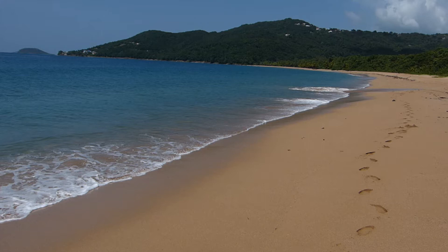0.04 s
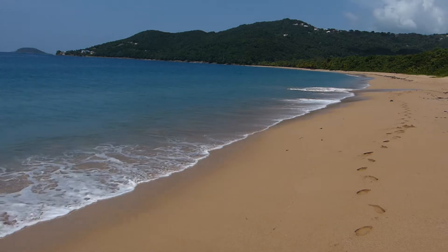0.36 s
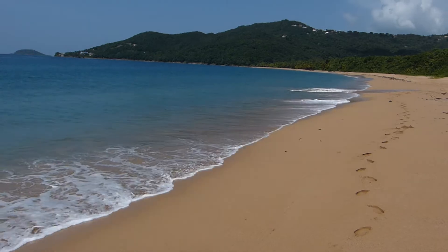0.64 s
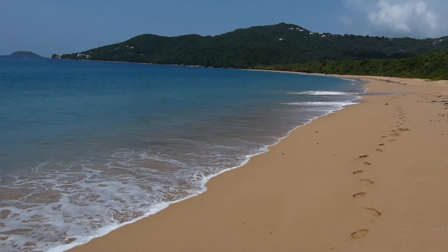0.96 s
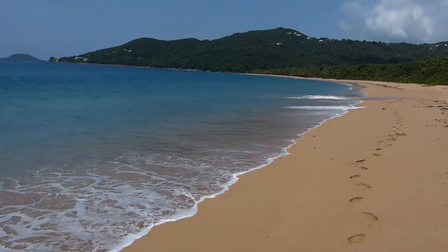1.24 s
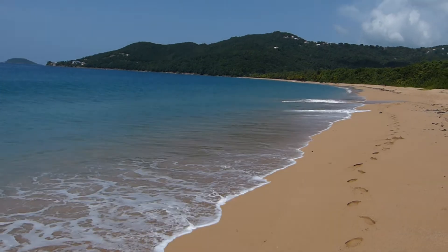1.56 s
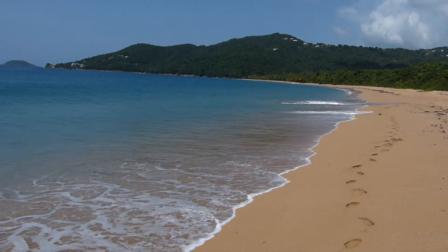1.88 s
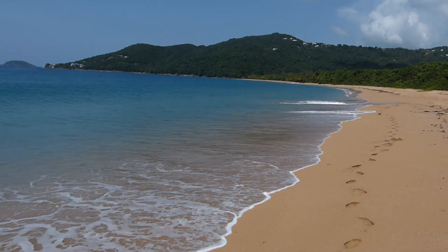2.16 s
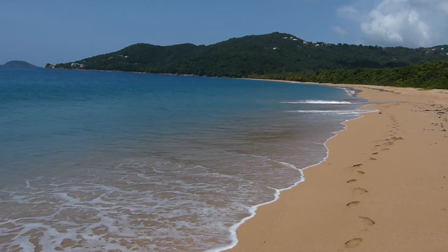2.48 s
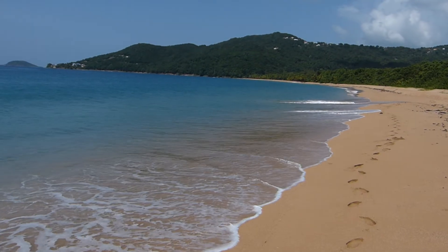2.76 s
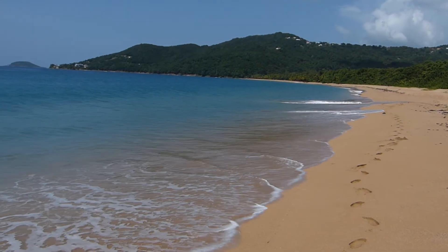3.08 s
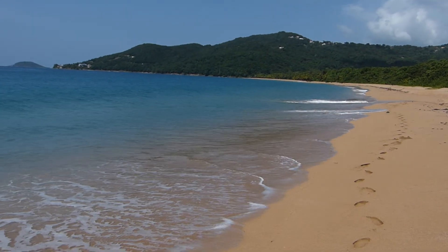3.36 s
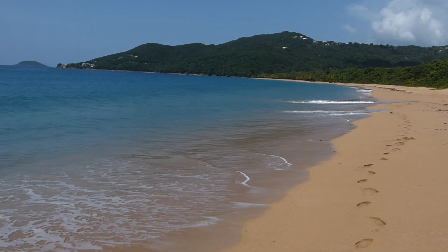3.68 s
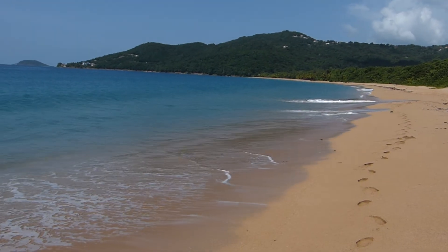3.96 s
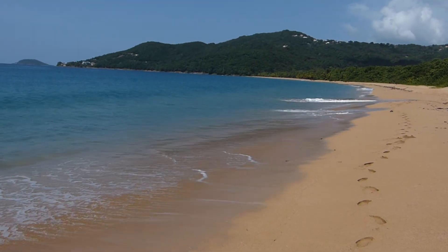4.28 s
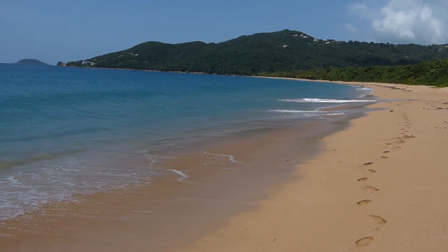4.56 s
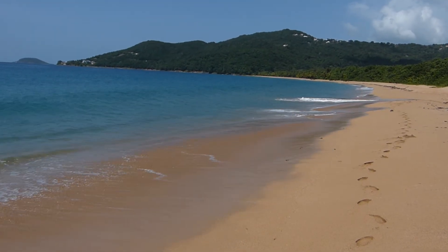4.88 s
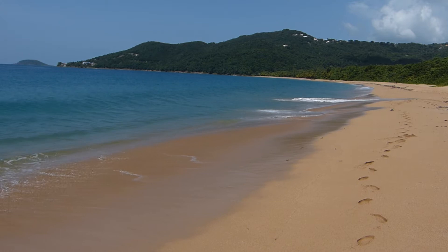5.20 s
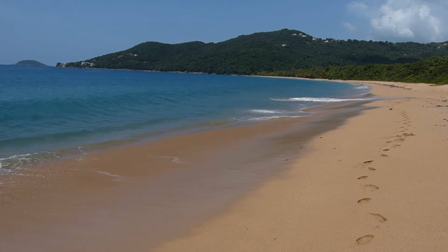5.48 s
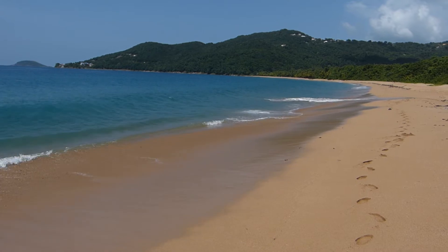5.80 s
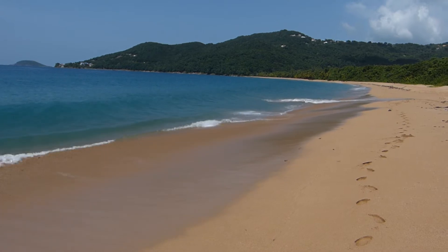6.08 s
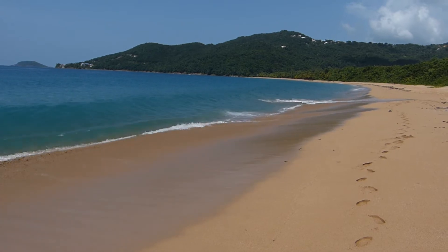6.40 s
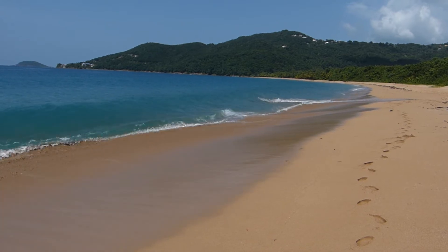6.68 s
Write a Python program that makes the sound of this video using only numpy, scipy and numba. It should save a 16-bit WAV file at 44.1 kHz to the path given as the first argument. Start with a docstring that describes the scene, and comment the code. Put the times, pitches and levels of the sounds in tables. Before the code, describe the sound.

After a brief silence, the sound of a sandy beach starts at about 0.6 seconds. Sea foam fizzes up the sand in several hissing surges over a faint, dull wash of distant surf. Wind buffets the stereo microphone throughout with a wide, low rumble and short thumps, strongest around 1 second and slowly easing. Between 2 and 3 seconds the fizz turns finer as the water drains back, growing quieter by 4.5 seconds. From about 4.8 seconds the next wave gurgles and builds on the left. Its crest splashes near 5.5 seconds, then collapses into a loud, bubbling roar with spray and deep churning, peaking just after 6 seconds. A few slaps of water fall among the crash, which stays loud until the end at nearly 7 seconds.

```python
"""A sandy beach with small waves, the sea to the left of two closely spaced microphone ports.
A sheet of foam fizzes up the sand as its tiny bubbles burst, then drains back over a wash of far surf.
The next wave gurgles, steepens and breaks: a roar of ringing bubbles, spray, big air pockets, slaps.
Wind eddies buffet the ports all the while and push the two channels in opposite directions."""
import sys
import numpy as np
from scipy import signal
from scipy.fft import rfft, irfft, next_fast_len
from scipy.io import wavfile
from scipy.ndimage import uniform_filter1d
from numba import njit

SR = 44100
rng = np.random.default_rng(int(sys.argv[2]) if len(sys.argv) > 2 else 0)


def wav_out(sig):
    """Save sig, one row per channel (or a flat mono array), as 16-bit PCM at SR to the path in sys.argv[1]."""
    wavfile.write(sys.argv[1], SR, np.round(np.clip(np.atleast_2d(sig).T, -1, 1) * 32767).astype(np.int16))


N = 301644


def undb(db):
    return 10 ** (np.asarray(db) / 20)


def unit_rms(x):
    return x / np.sqrt(np.mean(x ** 2))


def curve(rows):
    """(seconds, value) points joined by lines, per sample."""
    return np.interp(np.arange(N) / SR, *np.transpose(rows))


def swells(rows, squareness=3.75):
    """Sum of flat-topped bumps in dB; length is the width at half height."""
    t = np.arange(N) / SR
    return sum(db * .5 ** (np.abs(2 * (t - s) / length) ** squareness) for s, length, db in rows)


def over_bins(points):
    """(Hz, value) points joined on a log-frequency axis, per FFT bin."""
    hz, value = np.transpose(points)
    return np.interp(np.log(np.fft.rfftfreq(next_fast_len(N), 1 / SR) + 1), np.log(hz), value)


def filtered(x, bin_gain):
    return irfft(rfft(x, next_fast_len(N)) * bin_gain, next_fast_len(N))[..., :N]


def flicker(rate_hz):
    """Random steps, smoothed twice; rms 1."""
    hold = max(int(SR / rate_hz), 1)
    steps = np.repeat(rng.standard_normal(N // hold + 1), hold)
    return unit_rms(uniform_filter1d(uniform_filter1d(steps, hold), hold)[:N])


def crossfade(first, second, share):
    return first * np.sqrt(1 - share) + second * np.sqrt(share)


@njit
def ring(start, hz, size, cycles, glide):
    """Each bubble rings for some cycles, rising in pitch as it nears the surface."""
    out = np.zeros(N)
    for k in range(len(start)):
        first, length = int(start[k]), int(cycles * SR / hz[k]) + 2
        phase = 0.
        for i in range(min(length, N - first)):
            age = i / length
            phase += 2 * np.pi * hz[k] / SR * (1 + glide * age)
            out[first + i] += size[k] * np.exp(-5 * age) * np.sin(phase)
    return out


def bubbles(low_hz, high_hz, cycles, spread_db, count):
    """A cloud of randomly timed bubbles with even power per Hz; rms 1."""
    when, pitch, luck = rng.random((count, 3)).T
    hz = low_hz * (high_hz / low_hz) ** pitch
    size = hz * undb(-spread_db * np.log(np.maximum(luck, 1 / 60)))
    return unit_rms(ring(when * N, hz, size, float(cycles), glide=0.1))


# Port directivity. Each row: frequency in Hz, share of left_db that applies.
DIRECTIVITY = [(10000, 1), (12000, .1)]

def water(grains, grain_db, spectrum, correlation, left_db):
    """Single bubbles over the hiss of countless others, coloured and spread in stereo."""
    gain = undb(over_bins(spectrum))
    alike = np.clip(over_bins(correlation), -.98, .98)
    hiss = rng.standard_normal((2, N))
    common, apart = hiss + undb(grain_db) * np.array([grains, np.roll(grains, N // 2)])
    mid = filtered(common, gain * np.sqrt(1 + alike))
    side = filtered(apart, gain * np.sqrt(1 - alike))
    lean_db = left_db * over_bins(DIRECTIVITY) / 2
    pair = filtered(np.array([mid + side, mid - side]), undb([lean_db, -lean_db]))
    return pair / np.std(pair.mean(axis=0))


# Foam running up, then draining. Each row: frequency in Hz, gain in dB.
UPRUSH_SPECTRUM = [(60, -40), (300, 13), (800, -3), (1500, -0.5), (2500, 1), (3500, -4), (4000, 0.5),
                   (5000, 2), (7400, 2), (8600, 0.5), (10300, -6.5), (12400, -13.5), (15000, -29)]
BACKWASH_SPECTRUM = [(60, -31), (300, -11), (900, -2.5), (1400, 3), (1900, -8), (2300, -2.5), (3000, -7.5),
                     (3900, -8), (5200, -0.5), (6100, -1), (7500, 2.5), (8700, 1), (10300, -4.5),
                     (12400, -11), (15000, -23)]
# Foam and far surf. Each row: frequency in Hz, left-right correlation.
WASH_CORRELATION = [(300, 0.36), (1500, 1), (2400, 0.75), (3300, 0.41), (4200, 0.59), (6500, 0.76),
                    (7800, .4), (9000, .08), (15000, .05)]
# Tongues of foam. Each row: centre in seconds, length in seconds, lift in dB.
FOAM_TONGUES = [(0.65, 0.17, 7.8), (1.33, 0.91, 8.7), (1.33, 0.24, 1.7), (1.72, 0.069, 1.3), (1.97, 0.2, 6),
                (2.21, 0.27, 6.5), (2.53, 0.16, 2.3), (3.05, 0.57, 2.7), (3.66, 0.34, 2), (3.9, 0.22, 4.3),
                (4.36, 0.31, 1)]

def swash(rest_db=-58.5):
    """Tiny bubbles burst in each tongue of foam; as the sheet drains only the finest are left."""
    pops = bubbles(low_hz=1940, high_hz=11000, cycles=7.2, spread_db=4, count=26000)
    fine = bubbles(low_hz=2920, high_hz=11500, cycles=4.1, spread_db=3.5, count=26000)
    uprush = water(pops, -8.5, UPRUSH_SPECTRUM, WASH_CORRELATION, left_db=4.5)
    backwash = water(fine, -9, BACKWASH_SPECTRUM, WASH_CORRELATION, left_db=3)
    draining = curve([(2.1, 0.21), (2.8, 0.91)])
    fizz_db = rest_db + swells(FOAM_TONGUES) + 0.33 * flicker(25.2)
    return crossfade(uprush, backwash, draining) * undb(fizz_db)


# Distant waves. Each row: frequency in Hz, gain in dB.
SURF_SPECTRUM = [(25, 3), (60, -15), (200, 7), (500, -4), (900, -1.5), (1400, -15.5), (2000, -12),
                 (5000, -18.5), (12000, -36)]

def far_surf(level_db=-58):
    """Waves further along the bay merge into a dull, slowly swelling wash."""
    cloud = bubbles(low_hz=402, high_hz=3040, cycles=11.5, spread_db=1.5, count=6000)
    wash = water(cloud, -9.5, SURF_SPECTRUM, WASH_CORRELATION, left_db=-2)
    return wash * undb(level_db + .5 * flicker(3.26))


def eddies(spectrum, gust_db):
    """Big eddies follow the gusts weakly; small ones flare up. Rms near 1 at gust_db = 0."""
    big = over_bins([(90, 1), (200, 0)])
    small = over_bins([(450, 0), (1000, 1)])
    band_gains = undb(over_bins(spectrum)) * np.array([big, 1 - big - small, small])
    bands = filtered(rng.standard_normal(N), band_gains)
    swing_db = [.65 * gust_db, gust_db, 1.15 * gust_db + 1.6 * flicker(120)]
    return np.sum(bands * undb(swing_db), axis=0) / np.std(bands.sum(axis=0))


# Turbulence at the ports. Each row: frequency in Hz, gain in dB.
EDDY_SPECTRUM = [(20, -45), (43, -40), (65, -28), (86, -16.5), (110, -9), (150, -2), (195, .3), (300, -.7),
                 (400, -3.3), (550, -9.5), (800, -18.5), (1200, -30), (1800, -42.5), (2600, -54),
                 (5000, -85)]
RUMBLE_SPECTRUM = [(20, -26), (45, -30), (65, -15), (100, -6), (170, 0.5), (280, -5.5), (550, -11),
                   (1000, -21.5), (2000, -33), (5000, -69)]
# Breeze, slowly dying down. Each row: time in seconds, level in dB.
BREEZE = [(0.6, -30.5), (0.85, -27.5), (1.14, -21), (1.45, -29), (1.8, -26.5), (2.08, -25.5), (2.7, -32),
          (3.35, -30.5), (3.8, -30), (4.1, -29.5), (4.75, -33), (5.1, -31.5), (5.4, -30.5), (5.6, -29),
          (5.9, -35), (6.8, -33.5)]
# Each row: centre in seconds, length in seconds, lift (gusts) or drop (lulls) in dB.
GUSTS = [(0.685, 0.067, 10), (0.742, 0.021, 6), (0.96, .04, 1.5), (1.055, 0.094, 4), (1.335, 0.055, 4.5),
         (1.64, .04, 4.5), (2.225, 0.065, 1.5), (2.32, 0.11, 2), (2.48, 0.022, 3), (2.59, 0.08, 1),
         (2.88, 0.078, 3.5), (2.975, 0.03, 5), (3.04, .04, 2.5), (3.51, 0.023, 3.5), (3.945, 0.028, 5.5),
         (4.48, 0.18, 3), (4.93, .03, 1.5), (5.265, 0.044, 1.5), (5.48, 0.049, 5), (6.8, 0.055, 7.5)]
LULLS = [(1.51, 0.019, 10), (1.56, 0.025, 3), (1.895, 0.036, 9), (2.44, 0.034, 7), (2.8, 0.058, 2),
         (3.295, 0.03, 5), (3.6, 0.078, 8.5), (3.685, 0.059, 6), (5.11, 0.2, 4), (5.82, .035, 11),
         (5.925, 0.039, 5)]

def wind(mean_db=-30, rumble_db=-48.5):
    """Most of the turbulence moves the channels in opposite phase; a faint rumble reaches both alike."""
    flutter_db = .5 * flicker(40) + 1.3 * flicker(90)
    gust_db = curve(BREEZE) - mean_db + swells(GUSTS) - swells(LULLS) + flutter_db
    across = eddies(EDDY_SPECTRUM, gust_db) * undb(mean_db)
    rumble = eddies(RUMBLE_SPECTRUM, 0.92 * gust_db) * undb(rumble_db)
    return np.array([across * undb(-0.06), -across * undb(-0.67)]) + rumble


def swings(rows):
    """Short pressure swings that swell and die within a few cycles."""
    out, t = np.zeros(N), np.arange(N) / SR
    for s, db, hz, cycles in rows:
        near = slice(int((s - .1) * SR), int((s + .1) * SR))
        turns = (t[near] - s) * hz
        envelope = np.exp(-np.hypot(turns, .3) / cycles)
        out[near] += undb(db) * envelope * np.sin(2 * np.pi * turns)
    return out


# Each row: centre in seconds, gain in dB, pitch in Hz, decay in cycles, left over right in dB.
WIND_BUFFETS = [(0.653, -16, 290, .9, 2), (0.688, -16, 200, 1.8, 2), (0.841, -19, 260, 1, 0),
                (1.039, -17, 260, 1.4, 4.5), (1.055, -9, 330, 1.5, 2), (1.085, -12, 400, 1, 1.5),
                (1.113, -17, 270, 1, 3), (1.169, -16, 330, 1.2, 0), (1.201, -16, 340, 1.2, 1),
                (1.268, -18, 280, 1.2, 5.5), (1.315, -14, 300, 1.4, 0), (1.338, -11, 400, 2.2, 1),
                (1.425, -22, 280, 2, 1), (1.47, -23, 450, 1.4, 4), (1.539, -14.5, 320, .9, 1),
                (1.641, -16.5, 420, 1.2, 1.5), (1.821, -17, 330, 1.2, 2), (1.997, -13.5, 270, 1, 1.5),
                (2.07, -19, 210, 2.4, 3.5), (2.206, -18, 290, 1.5, 1.5), (2.245, -15.5, 250, 1.1, 4.5),
                (2.312, -17, 280, 1.2, 2.5), (2.47, -17.5, 260, 1.8, 2), (2.591, -18, 235, 1.2, 2.5),
                (2.739, -21, 260, 1.4, 2.5), (2.97, -16, 290, 1.2, 2), (3.049, -19, 350, 1.3, 1),
                (3.246, -21, 350, 1.3, 1), (3.444, -19, 250, 1.1, 1), (3.945, -13, 220, 2.2, 2.5),
                (4.384, -20, 250, .9, 1), (4.43, -18, 210, 1.8, 1.5), (4.544, -20, 300, 1.5, 2),
                (4.928, -23, 210, 2, 2.5), (5.256, -20, 290, 1.1, 1), (5.372, -20, 280, 1.3, 1.5),
                (5.497, -16, 210, 1.2, 2), (6.001, -23, 300, 1, 1.5), (6.353, -21, 240, 1.4, 1.5),
                (6.794, -17, 300, 1.6, 1.5)]

def buffets():
    """A strong eddy passes as one pressure swing, pushing on the left port and pulling on the right."""
    left = swings([row[:4] for row in WIND_BUFFETS])
    right = -swings([(s, db - skew_db, hz, cycles) for s, db, hz, cycles, skew_db in WIND_BUFFETS])
    low_cut = over_bins([(60, 0), (170, 0.89)])
    return filtered(np.array([left, right]), low_cut)


# Bubbles before and during the break. Each row: frequency in Hz, gain in dB.
GURGLE_SPECTRUM = [(60, -23), (125, 0), (450, -16), (750, 0), (1050, 3.5), (1380, 3.5), (1650, -1),
                   (1950, -6), (2600, -6), (4000, -31), (9000, -58)]
ROAR_SPECTRUM = [(40, -42), (150, -4.5), (450, -8), (700, 1), (860, 3), (1130, 0.5), (1380, 3),
                 (1600, -0.5), (1900, -3.5), (2600, -10.5), (4000, -32), (9000, -60)]
# Roar, spray and plunge. Each row: frequency in Hz, left-right correlation.
WAVE_CORRELATION = [(100, -0.48), (350, -0.052), (600, -0.021), (850, 1), (1100, 0.27), (1500, 0.83),
                    (2200, 0.45), (3200, 0.75), (5500, 0.51), (7000, 0.53), (8500, -0.47), (14000, 0.14)]
# The bore running closer. Each row: time in seconds, lift in dB.
ROAR_LIFT = [(5.9, 2.4), (6.25, 0.5), (6.65, 4), (6.84, 1.5)]

def roar(slosh, gain_db=1.36):
    """Backwash gurgles as it meets the wave; the bubbles grow and the gurgle turns into a roar."""
    cloud = bubbles(low_hz=465.5, high_hz=3846, cycles=21, spread_db=-1.5, count=14000)
    roaring = water(cloud, -2, ROAR_SPECTRUM, WAVE_CORRELATION, left_db=10.8)
    gurgle = water(cloud, -10, GURGLE_SPECTRUM, WAVE_CORRELATION, left_db=7.5)
    arrival = curve([(3.3, 0.034), (3.9, 0.89), (4.6, 0.34), (5.1, 0.43)])
    steepening = curve([(5.2, 0.058), (5.75, 0.95)])
    roar_db = gain_db + curve(ROAR_LIFT) + 1.05 * slosh
    return crossfade(gurgle, roaring, steepening) * arrival * undb(roar_db)


# First splash of the crest, then its spray. Each row: frequency in Hz, gain in dB.
CURL_SPECTRUM = [(200, -52), (1200, -3), (1900, 10), (2400, 0), (2950, -9), (3300, 2), (3950, 3), (4400, 1),
                 (6100, 2.5), (6900, 0), (8400, 1.5), (10600, -8.5), (12000, -16), (15000, -52)]
SPRAY_SPECTRUM = [(200, -44), (1200, 2.5), (2400, 3), (3200, 0.5), (4000, -0.5), (4950, 1), (6500, -1.5),
                  (8400, -0.5), (9400, -4.5), (10600, -11.5), (12000, -17.5), (15000, -43)]

def spray(slosh, gain_db=-1.5):
    """The crest splashes as it curls, then throws a shower of drops as it collapses."""
    drops = bubbles(low_hz=2020, high_hz=11900, cycles=1.1, spread_db=2.5, count=30000)
    curl = water(drops, -4, CURL_SPECTRUM, WAVE_CORRELATION, left_db=8)
    shower = water(drops, -10, SPRAY_SPECTRUM, WAVE_CORRELATION, left_db=9)
    spilling = curve([(4.9, 0.24), (5.32, 0.5), (5.535, 0.55), (5.575, 0.9)])
    collapse = curve([(5.68, 0.09), (6.1, 0.99)])
    spray_db = gain_db + 0.19 * slosh + 0.72 * flicker(70)
    return crossfade(curl, shower, collapse) * spilling * undb(spray_db)


# Air pockets. Each row: frequency in Hz, gain in dB.
PLUNGE_SPECTRUM = [(25, -8), (60, -26), (130, -7.5), (270, -4.5), (450, -2), (760, -1.5), (1000, -1.5),
                   (1600, -27), (4000, -56)]

def plunge(gain_db=-5, attack_s=0.22, attack_end_s=5.67, growth_db_per_s=2.7):
    """Big air pockets, folded under the crest, ring low and ever louder."""
    pockets = bubbles(low_hz=214, high_hz=1217, cycles=10.2, spread_db=0, count=3000)
    churn = water(pockets, -7.5, PLUNGE_SPECTRUM, WAVE_CORRELATION, left_db=10)
    age_s = np.arange(N) / SR - attack_end_s
    attack = np.clip(1 + age_s / attack_s, 0, 1)
    return churn * attack * undb(gain_db + growth_db_per_s * age_s + 0.57 * flicker(21))


# The wave nearing, spilling, collapsing. Each row: time in seconds, level in dB.
WAVE_STRENGTH = [(4.55, -65), (4.85, -53.7), (5.25, -49.8), (5.55, -41.7), (6.15, -32.5), (6.6, -33.8),
                 (6.84, -33.5)]
# Stretches of crest falling. Each row: centre in seconds, length in seconds, lift in dB.
CREST_TUMBLES = [(5.45, .11, 1.2), (5.61, 0.12, 1.2), (6.24, 0.15, 1.3), (6.39, 0.15, 1.6),
                 (6.63, 0.19, 1.6)]

def breaker():
    """Roar, spray and plunge all follow the strength of the breaking wave."""
    wave_db = curve(WAVE_STRENGTH) + swells(CREST_TUMBLES)
    slosh = flicker(30)  # lifts roar and spray together
    return undb(wave_db) * (roar(slosh) + spray(slosh) + plunge())


# Each row: centre in seconds, gain in dB, pitch in Hz, decay in cycles.
WATER_SLAPS = [(5.851, -26, 850, 1.2), (5.962, -27, 1400, 1), (6.246, -25, 1200, 1), (6.636, -19, 900, .7),
               (6.681, -24, 1100, 1.2)]

def slaps(left_db=10):
    """Lumps of water thrown clear of the crest fall back on the left, each trapping a pocket of air."""
    return swings(WATER_SLAPS) * undb([[left_db / 2], [-left_db / 2]])


def scene():
    return swash() + far_surf() + wind() + buffets() + breaker() + slaps()


# Cavity resonances behind the ports. Each row: frequency in Hz, gain in dB.
PORT_RESPONSE = [(2500, 0), (2850, 0.5), (3300, 3), (3650, 1), (4020, 4), (4370, -1), (4750, 2),
                 (5300, 0.5)]
START_S, LOWPASS_HZ = .584, 15100

def record(dry):
    """The ports colour the sound; it is silent until START_S, and the top treble is cut."""
    gate = np.clip((np.arange(N) / SR - START_S) / .003, 0, 1)
    heard = filtered(dry, undb(over_bins(PORT_RESPONSE))) * gate
    lowpass = signal.ellip(8, .2, 80, LOWPASS_HZ, fs=SR, output="sos")
    return signal.sosfilt(lowpass, heard)


dry = scene()
out = record(dry)
wav_out(out)
```